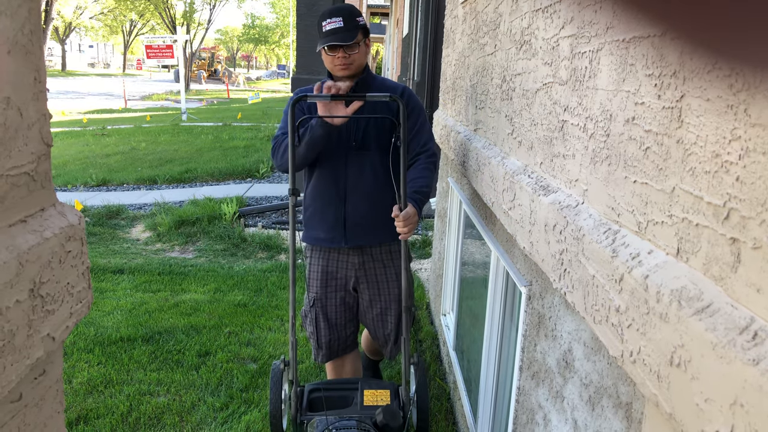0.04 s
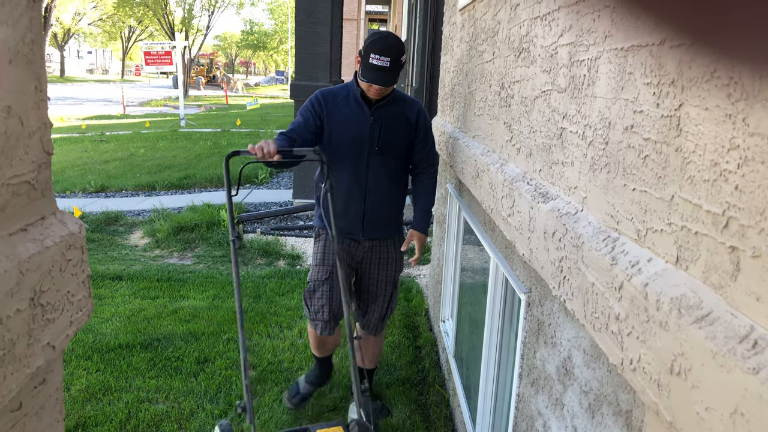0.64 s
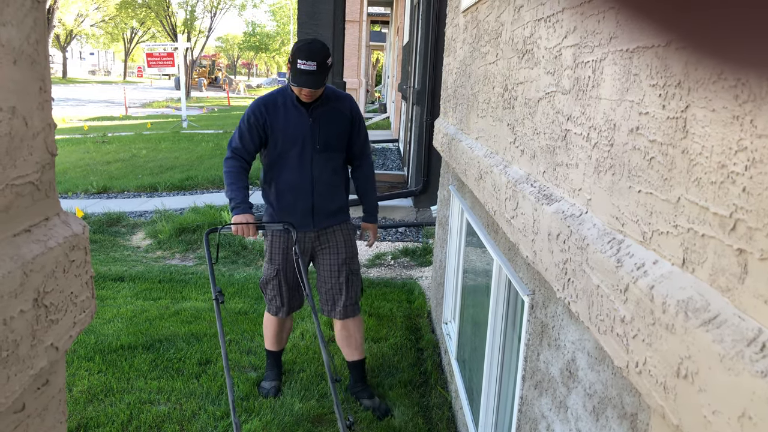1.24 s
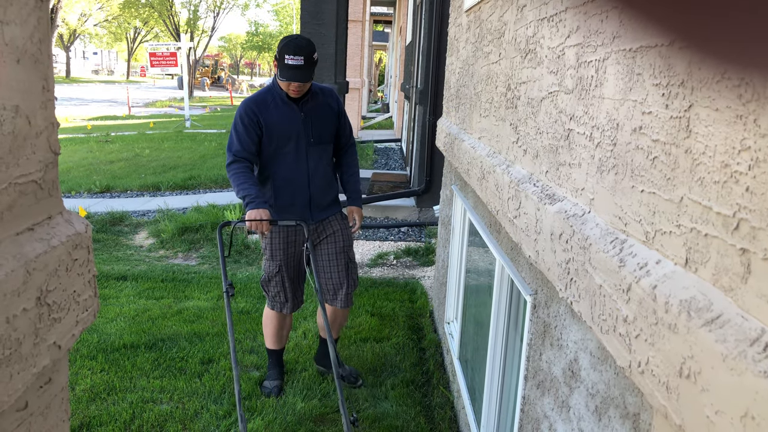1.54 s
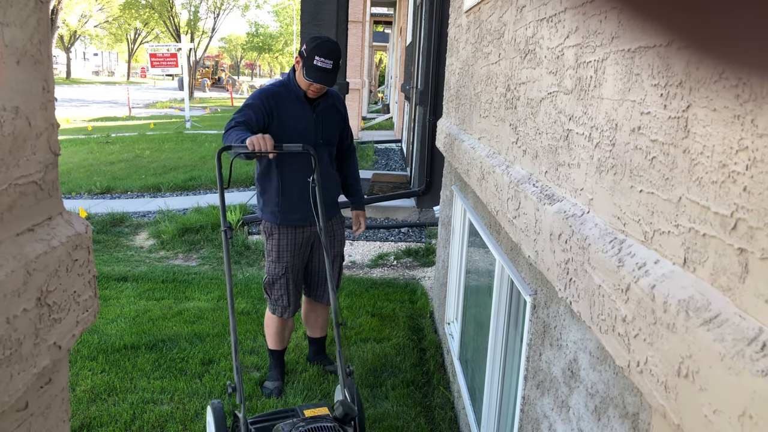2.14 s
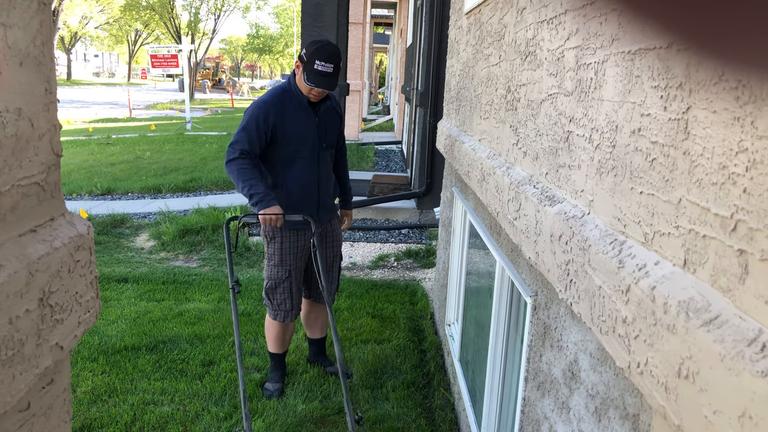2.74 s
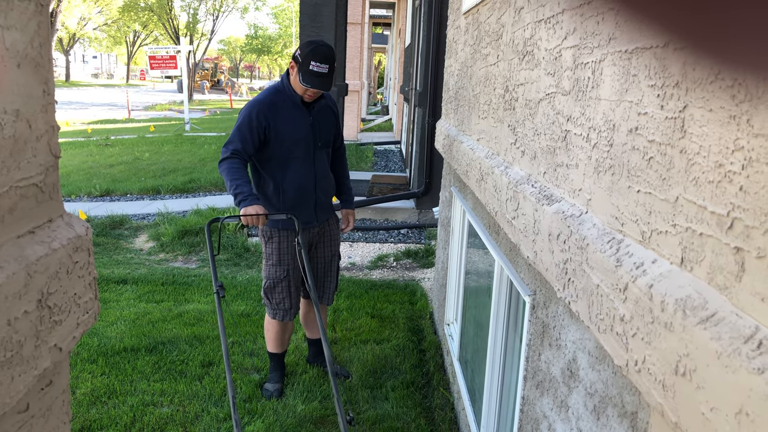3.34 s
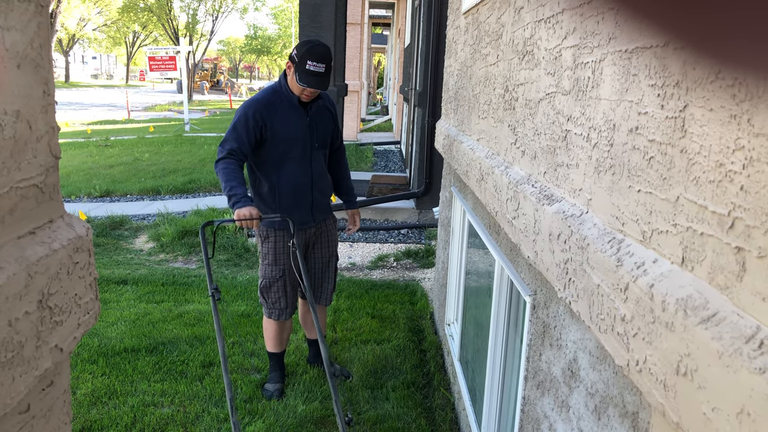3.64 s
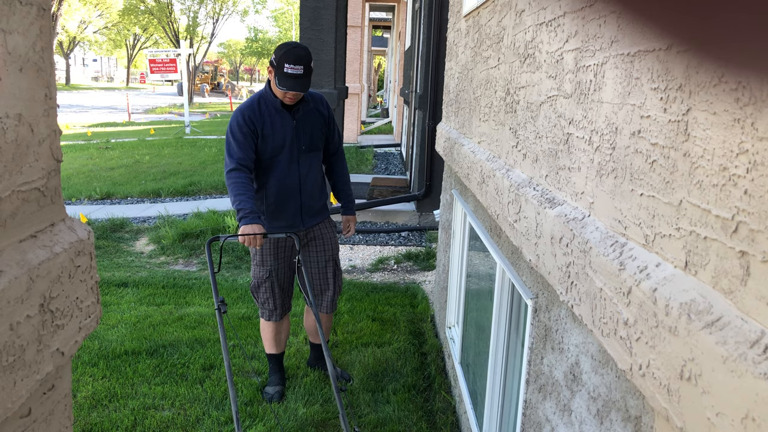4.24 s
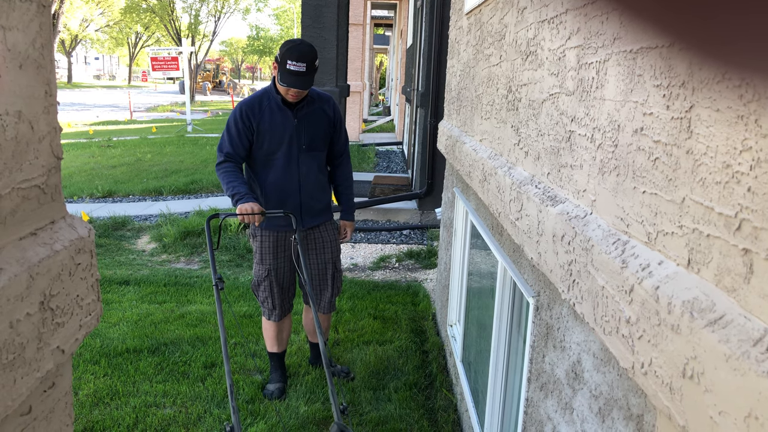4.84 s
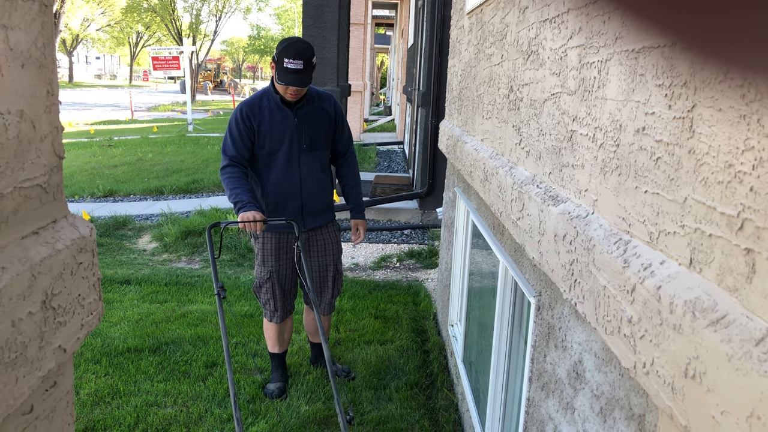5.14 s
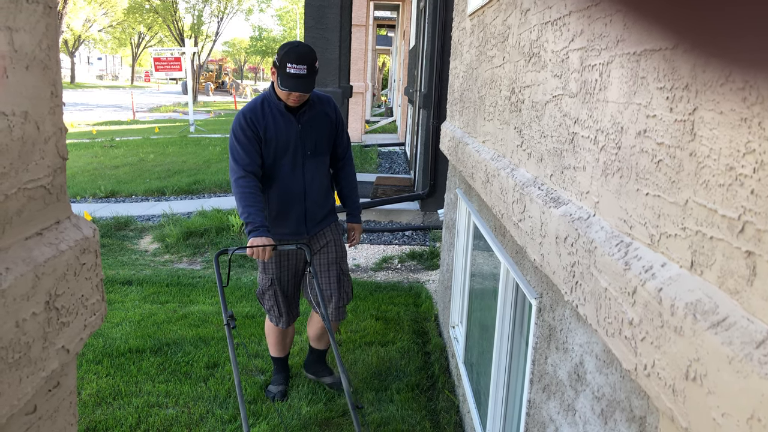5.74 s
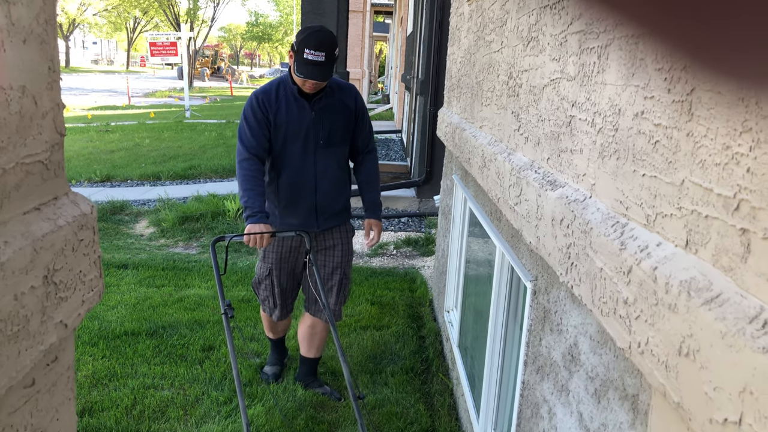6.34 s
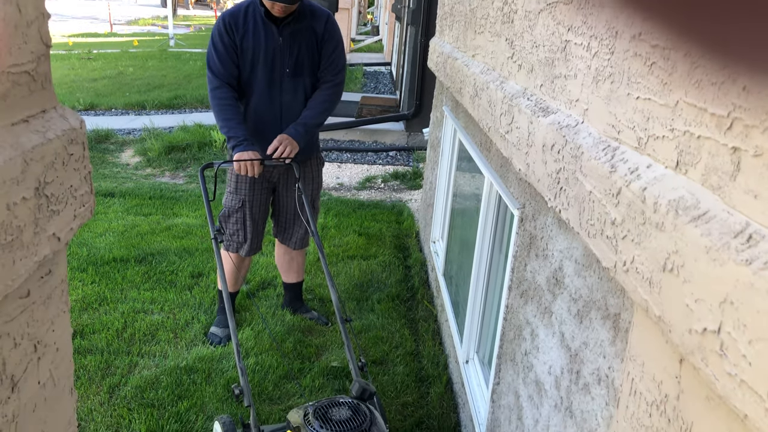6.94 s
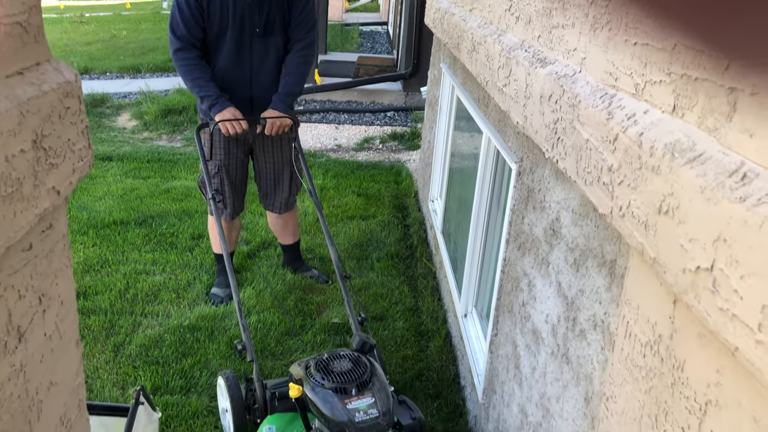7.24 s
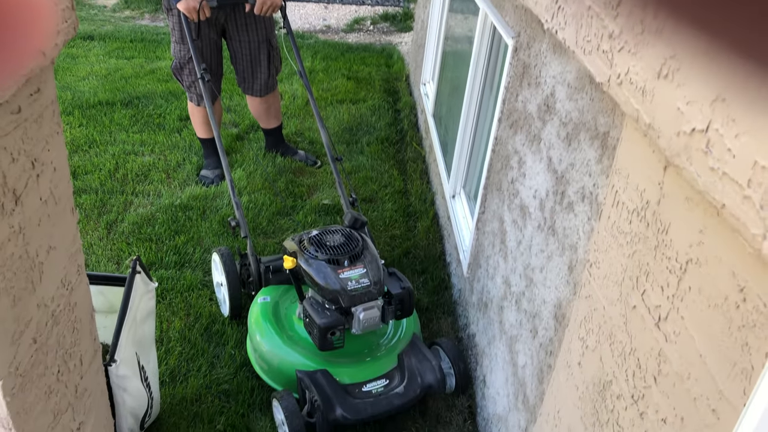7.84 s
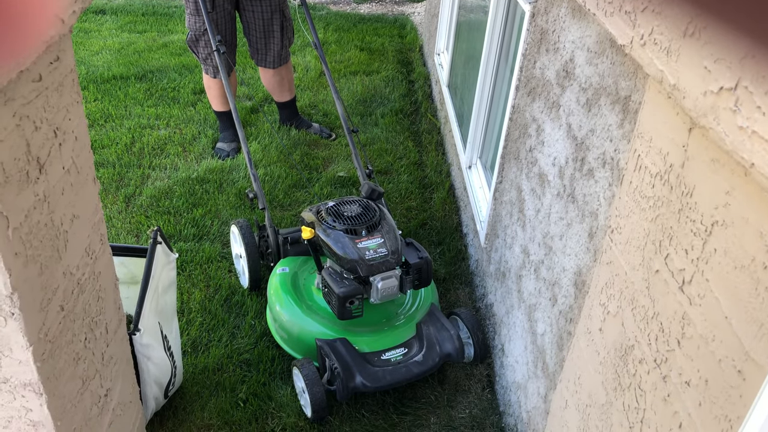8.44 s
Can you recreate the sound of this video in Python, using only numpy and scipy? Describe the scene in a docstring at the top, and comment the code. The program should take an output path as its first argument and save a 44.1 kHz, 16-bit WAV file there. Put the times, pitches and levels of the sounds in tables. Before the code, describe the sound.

Close by, between two house walls, a lawn mower is shunted over grass without its engine running. Soft wheel thuds lead into sharp metallic clacks, clinks and rattles from the loose handle, mixed with hollow plastic knocks. The clatter dies down halfway, leaving a faint rustle of a finger near the microphone, a low town rumble and barely audible birds. A quick run of dry ratchet clicks from the wheels ends it.

```python
"""A lawn between two house walls, a push mower shunted about close to the microphone, engine off.
Its loose steel handle slams and clacks in the brackets and sets the deck booming; the wheels tick,
knock and bump over the turf, and their ratchet snaps as the mower is pushed forward.
Grass swishes, a finger rubs and slides near the microphone, and the walls echo the mower.
Far off are the rumble of a town and a few faint birds."""
import sys
import numpy as np
from scipy import signal
from scipy.fft import rfft, irfft, next_fast_len
from scipy.io import wavfile

SR = 44100
rng = np.random.default_rng(int(sys.argv[2]) if len(sys.argv) > 2 else 0)


def store_pcm(level_fs):
    """Save levels as 16-bit WAV."""
    pcm = np.round(np.clip(level_fs, -1, 1) * 32767).astype(np.int16)
    wavfile.write(sys.argv[1], SR, np.atleast_2d(pcm).T)


N = 383669
TIME = np.arange(N) / SR
AGE = TIME[:SR * 3 // 10]   # time since a blow [s]
EDGE_GROWTH = 1.64   # dB of bright edge per dB of blow: harder blows are brighter

# Levels in all tables are relative: each layer adds its own gain.
# resonances of deck, handle bracket, small steel edges, wheel pawl: (pitch [Hz], width [Hz], level [dB])
DECK_MODES = [(156, 23, -1), (196, 24, -6), (232.7, 4.4, 1.5), (318.2, 33, 0), (337.6, 44.4, -1),
              (369, 78, -5.5), (468.4, 9.4, -3), (561, 31, -6.5), (603, 34, -9), (704, 36, -5.5),
              (808, 62, -8), (936, 180, -12.5), (1125, 34, -13.5), (1184, 230, -12)]
BRACKET_MODES = [(1490, 183.5, -16.5), (1710, 210, 0.5), (1873, 276, 4), (2114, 610, -2), (2600, 310, 4),
                 (2890, 760, 1.5), (3460, 420, 2.5), (3580, 390, 0.5), (4200, 680, -5.5), (4660, 520, -6.5),
                 (5300, 520, -22.5)]
EDGE_MODES = [(5640, 1000, -2.5), (6900, 470, -1), (8200, 1700, -2.5), (9950, 900, 2.5), (10500, 1300, -1),
              (12100, 1500, -3), (14600, 1100, -5)]
PAWL_MODES = [(453, 120, 2.5), (690, 230, 7), (920, 150, 6), (1240, 140, 7.5), (1766, 170, 3.5),
              (2160, 320, 6.5), (2550, 430, 4), (3370, 940, -2)]
# how briskly the mower rolls: (time [s], level [dB])
ROLLING_LEVEL = [(0, -69), (0.2, -50.5), (0.55, -56), (0.93, -53), (1.02, -27), (1.17, -41), (1.55, -59),
                 (1.75, -49.5), (2.45, -46.5), (2.6, -50), (2.75, -46), (3.15, -49.5), (3.38, -43.5),
                 (3.62, -56), (3.84, -42.5), (4.15, -58.5), (5.7, -54.5), (7, -82)]
# swish of the grass and of the sliding finger: (frequency [Hz], level [dB])
SWISH_SPECTRUM = [(700, -25.5), (1500, 5.5), (3000, 3.5), (4800, -5.5), (7500, -10.5), (10000, -15.5),
                  (14000, -20.5)]


def handle_slams(ping_hz=3570, swell_s=0.00201, choke_s=0.00044, ring_s=0.0051, buzz_s=0.012):
    """Steel hits the end stop: a ping swells until the handle's weight chokes it; the frame rings."""
    # slams: (time [s], level [dB])
    slams = [(0.994, -8), (1.33, -15.5), (2.7149, -8.5), (3.798, -11.5)]
    tone = np.sin(2 * np.pi * ping_hz * AGE)
    swell = np.minimum(AGE / swell_s, 1) ** .5
    choke = np.exp(-np.maximum(AGE - swell_s, 0) / choke_s)
    ring = tone * rise_and_decay(swell_s, ring_s)
    out = np.zeros(N)
    for at, db in slams:
        add(out, at, from_db(db - 2) * tone * swell * choke)
        add(out, at + swell_s, from_db(db - 19.5) * ring)
        add(out, at, blow(DECK_MODES, db - 23, .0015, buzz=(4, .018), tail=(-24, .064), strike=15))
        add(out, at, blow(BRACKET_MODES, db - 19, .002,
                          buzz=(-.5, buzz_s), tail=(-30, .062), strike=12.84))
        add(out, at, blow(EDGE_MODES, db - 30.5, .0023, buzz=(-10, buzz_s), tail=(-23, .029), strike=10))
    return out


def handle_clacks():
    """The handle bounces in its brackets: they ring briefly, the heavy deck booms on."""
    # bounces: (time [s], bracket level [dB], deck level [dB])
    bounces = [(1.11, -15, -33.5), (1.2446, -13.5, -32.5), (1.473, -34.5, -47), (1.696, -24.5, -44),
               (3.0711, -27.5, -46), (3.5502, -24.5, -39), (3.691, -27, -40), (4.02, -33.5, -43)]
    out = np.zeros(N)
    for at, ring_db, boom_db in bounces:
        add(out, at, blow(DECK_MODES, boom_db, .006, buzz=(20.5, .036), tail=(-17, .07), strike=50))
        add(out, at, blow(BRACKET_MODES, ring_db - 12.5, .0069,
                          buzz=(-8.5, .018), tail=(-28, .097), strike=18.6))
        add(out, at, blow(EDGE_MODES, EDGE_GROWTH * ring_db - 12, .01,
                          buzz=(-29, .01), tail=(-10, .022), strike=5))
    return out


def joint_rattles():
    """Joints shift and grind in softer, longer contacts as the frame takes up its slack."""
    # shifts: (time [s], bracket level [dB], deck level [dB])
    shifts = [(0.964, -41, -37), (0.9775, -21, -23), (1.013, -48, -31.5), (1.032, -45, -27),
              (1.042, -30, -30), (1.654, -42.5, -33.5), (1.984, -50, -38.5), (2.37, -50, -38),
              (2.7624, -36, -38), (2.9283, -38, -37.5), (2.974, -33.5, -39), (2.988, -33.5, -35.5),
              (3.298, -44, -31), (3.322, -28.5, -32), (3.417, -39.5, -35.5)]
    out = np.zeros(N)
    for at, ring_db, boom_db in shifts:
        add(out, at, blow(DECK_MODES, boom_db - 4, .014, buzz=(-4.5, .052), tail=(-10, .06), strike=9.9))
        add(out, at, blow(BRACKET_MODES, ring_db - 8, .0074,
                          buzz=(1, .019), tail=(-30.5, .075), strike=12))
        add(out, at, blow(EDGE_MODES, EDGE_GROWTH * ring_db - 2, .0075, buzz=(-8, .023), tail=(-36, .03)))
    return out


def bolt_clinks(rise_s, decay_s):
    """A loose bolt clinks on one note at a time and stirs the bracket."""
    # clinks: (time [s], level [dB], pitch [Hz])
    clinks = [(2.048, -36, 2800), (2.7617, -37, 2550), (2.9745, -28.5, 3500), (3.301, -32, 3450),
              (3.3915, -31.5, 2700), (3.678, -36.5, 2600), (4.0198, -29, 2880), (4.0403, -35.5, 3340)]
    envelope = (1 - np.exp(-AGE / rise_s)) ** 2 * np.exp(-AGE / decay_s)
    out = np.zeros(N)
    for at, db, hz in clinks:
        add(out, at, from_db(db) * np.sin(2 * np.pi * hz * AGE) * envelope / envelope.max())
        add(out, at, blow(BRACKET_MODES, db - 21, .0017, buzz=(.5, .021), tail=(-22.5, .066), strike=9))
    return out


def handle_and_hub_clicks():
    """Crisp clicks from the handle and, at the end, plastic snaps from the wheel hub."""
    # clicks and snaps: (time [s], level [dB])
    snaps = [(1.028, -31), (1.089, -24.5), (2.0018, -36), (2.108, -36.5), (2.248, -39.5), (2.356, -29),
             (2.4273, -30), (2.986, -34), (5.514, -36), (8.372, -32), (8.6671, -29)]
    # their resonances: (pitch [Hz], width [Hz], level [dB])
    snap_modes = [(1400, 280, 6), (1950, 500, 1), (2700, 540, -1), (3450, 780, -2.5), (4500, 600, -8),
                  (5700, 830, -11.5), (8280, 2200, -17.5)]
    out = np.zeros(N)
    for at, db in snaps:
        add(out, at, blow(snap_modes, db - 15.5, .005, buzz=(-13.5, .021), tail=(-24.5, .054), strike=8))
    return out


def loose_parts(per_s_per_db, contact_s, still_db):
    """Small parts chatter louder and more often as the mower rolls faster; below still_db they rest."""
    rolling_db = curve(ROLLING_LEVEL)
    touches = clicks(per_s_per_db * np.maximum(rolling_db - still_db, 0), spread_db=6)
    envelope = signal.lfilter([1], [1, -np.exp(-1 / (contact_s * SR))], touches)
    contacts = envelope * rng.standard_normal(N)
    pawl = from_db(-22) * rms_one(resonate(contacts, PAWL_MODES))
    bracket = from_db(-34.5) * rms_one(resonate(contacts, BRACKET_MODES))
    return from_db(rolling_db) * (pawl + bracket)


def deck_thumps(db_per_octave, rise_s, decay_s):
    """The deck lands with its whole weight, heaves at one pitch and stirs the modes around it."""
    # landings: (time [s], level [dB], pitch [Hz])
    landings = [(0.981, -27, 357), (0.993, -32.5, 270), (1.051, -28, 300), (2.722, -32, 197),
                (3.326, -26.5, 282), (3.784, -34.5, 191), (3.802, -30.5, 157), (4.823, -47.5, 380),
                (5.507, -52.5, 276)]
    heave = rise_and_decay(rise_s, decay_s)
    out = np.zeros(N)
    for at, db, centre_hz in landings:
        stirred = [(hz, width, mode_db - db_per_octave * abs(np.log2(hz / centre_hz)))
                   for hz, width, mode_db in DECK_MODES]
        add(out, at, from_db(db + 7) * np.sin(2 * np.pi * centre_hz * AGE) * heave / heave.max())
        add(out, at, blow(stirred, db - 6, .002, buzz=(-8, .043), tail=(-28, .046), strike=4.9, top_hz=700))
    return out


def wheels():
    """The plastic wheels tick as they turn and knock hollowly against the play in their axles."""
    # ticks: (time [s], level [dB])
    ticks = [(0.1404, -45), (0.165, -40), (0.2, -45), (0.2706, -41), (0.372, -44.5), (0.4464, -42.5),
             (0.5032, -41.5), (0.551, -50), (0.6, -50), (2.4616, -44.5), (2.675, -41), (2.913, -45),
             (3.046, -45.5), (3.775, -43.5), (4.034, -45), (4.087, -47), (4.2448, -49.5), (4.368, -49.5),
             (4.893, -52.5), (5.495, -43), (5.585, -51), (5.662, -50.5), (5.84, -49.5), (7.2837, -52.5)]
    # knocks: (time [s], level [dB], top of the contact's range [Hz])
    knocks = [(1.0455, -15, 1400), (1.071, -27, 1500), (1.163, -21, 990), (2.68, -24.5, 746),
              (2.793, -24, 890), (3.3215, -24, 1500), (3.781, -19.5, 1080), (3.872, -26.5, 976)]
    # resonances of a wheel: (pitch [Hz], width [Hz], level [dB])
    wheel_modes = [(300, 140, 7.5), (507, 78, 8), (644, 95, 8), (851, 59, 6.5), (1060, 130, 4),
                   (1320, 180, 7), (1700, 230, 2.5)]
    ticking, knocking = np.zeros((2, N))
    for at, db in ticks:
        add(ticking, at, blow(PAWL_MODES, db - 3.5, .015,
                              buzz=(-11, .031), tail=(-28.5, .04), strike=16, top_hz=3880))
    for at, db, top_hz in knocks:
        add(knocking, at, blow(wheel_modes, db - 13.5, .0015,
                               buzz=(7, .014), tail=(-27, .035), strike=31, top_hz=top_hz))
    return disperse(ticking, lag_s=0.0028) + disperse(knocking, lag_s=0.0025)


def ratchet(lag_s, rim_s, rim_db):
    """The pawl drops off a tooth: a dry snap, spread into a short falling chirp by the plastic wheel."""
    # drops: (time [s], level [dB])
    drops = [(7.749, -33), (7.842, -28.5), (7.8697, -33.5), (8.3028, -29), (8.349, -30), (8.377, -28),
             (8.4043, -27), (8.451, -30), (8.6674, -22)]
    # resonances of the ratchet in its wheel: (pitch [Hz], width [Hz], level [dB])
    ratchet_modes = [(380, 190, 3), (610, 34, 15), (910, 89, 4), (1058, 70, 6), (1350, 170, 7),
                     (1640, 180, 4.5), (2240, 330, 1.5), (2510, 450, 1), (2880, 400, -2.5),
                     (3340, 710, -11.5), (4130, 230, -16.5)]
    snap = resonate(1. * (AGE == 0), ratchet_modes)
    snap /= np.abs(snap).max()
    out = np.zeros(N)
    for at, db in drops:
        add(out, at, from_db(db) * snap)
        add(out, at + rim_s, from_db(db + rim_db) * snap)   # the wave comes back from the rim
        add(out, at, blow(PAWL_MODES, db - 20.5, .0023, buzz=(-4, .017), tail=(-28, .04), top_hz=4410))
    return disperse(out, lag_s)


def turf_bumps(rise_s, decay_s):
    """The wheels bump on soft turf, which swallows each thud within a few cycles."""
    # bumps: (time [s], level [dB], pitch [Hz])
    bumps = [(0.371, -28, 62), (0.387, -19, 154), (0.422, -27, 103), (0.48, -23, 74), (0.63, -25.5, 88),
             (2.182, -16, 182), (2.216, -20.5, 127), (2.254, -19, 66), (2.303, -25.5, 160),
             (2.328, -23.5, 84.5)]
    out = np.zeros(N)
    for at, db, hz in bumps:
        thud = np.sin(2 * np.pi * hz * AGE) * rise_and_decay(rise_s, decay_s)
        add(out, at, from_db(db - 7) * thud / np.abs(thud).max())
    return out


def lawn():
    """Wheels rumble and grass swishes under the deck as the mower rolls."""
    # rumble of the wheels: (frequency [Hz], level [dB])
    rumble_spectrum = [(50, -49), (100, -25.5), (160, 1.5), (320, 0.5), (500, -6), (900, -11),
                       (1500, -21.5), (2500, -24), (5000, -53.5)]
    rumble = from_db(-1.5) * noise(rumble_spectrum, flutter_db=4, flutter_per_s=210)
    blades = from_db(-25.5) * crackle(per_s=400, spread_db=4.5, top_hz=8000)
    swish = from_db(-10.5) * noise(SWISH_SPECTRUM, flutter_db=6, flutter_per_s=53)
    return from_db(curve(ROLLING_LEVEL)) * (rumble + swish + blades)


def finger_rubs(attack_s, release_s, swish_follows, pressure_db):
    """A finger rubs and slides near the microphone: strokes of rustle and high hiss over a lower swish."""
    # strokes: (start [s], length [s], rustle level [dB], hiss level [dB])
    strokes = [(0, 0.29, -65, -74), (0.465, 0.91, -58.5, -69), (1.453, 0.36, -60.5, -63),
               (1.868, 0.36, -64, -66), (2.417, 0.27, -57, -68), (2.893, 0.053, -56, -63),
               (3.216, 0.097, -66, -65), (4.082, 0.21, -62.5, -63.5), (4.43, 0.49, -67.5, -76),
               (5.32, 1.116, -62, -60), (5.7, 0.31, -61, -62), (6.112, 0.4, -87, -72),
               (6.548, 0.15, -66, -64.5), (6.78, 0.17, -63, -64), (7.168, 0.21, -60.5, -73),
               (7.425, 0.087, -63, -56.5), (7.542, 0.2, -72.5, -84)]
    # rustle of rubbing and hiss of sliding: (frequency [Hz], level [dB])
    rustle_spectrum = [(3000, -10.5), (4700, -7), (7500, -3.5), (10200, -6.5), (13000, -3), (17500, -6)]
    hiss_spectrum = [(9500, -22.5), (12000, -11.5), (14200, -5), (15500, -5), (17500, -16.5)]
    rubbing, sliding = from_db(-79), from_db(-77.5)
    for start, length, rustle_db, hiss_db in strokes:
        swell_s = attack_s * (1 + 2 * length)   # long strokes swell more slowly
        attack = (1 + np.tanh((TIME - start) / (2 * swell_s))) / 2
        release = (1 - np.tanh((TIME - start - length) / (2 * release_s))) / 2
        rubbing += from_db(rustle_db) * attack * release
        sliding += from_db(hiss_db) * attack * release
    pressure = from_db(pressure_db * drift(per_s=28))
    rustle = noise(rustle_spectrum, flutter_db=1.5, flutter_per_s=68)
    rustle += from_db(-12) * crackle(per_s=64, spread_db=3.5, top_hz=16050)
    hiss = noise(hiss_spectrum, flutter_db=3, flutter_per_s=400)
    swish = from_db(-23.5) * noise(SWISH_SPECTRUM, flutter_db=.5, flutter_per_s=30)
    return pressure * (rubbing * rustle + sliding * hiss) + rubbing ** swish_follows * swish


def brushes_and_ticks():
    """Quick brushes and short bright ticks: bell-shaped bursts of high noise."""
    # bursts: (time [s], level [dB], half length [s])
    bursts = [(0.118, -54, 0.001), (0.142, -50, 0.0015), (0.642, -54, 0.0095), (0.984, -47.5, 0.021),
              (1.043, -35, 0.012), (2.147, -43, 0.0013), (4.84, -44, 0.0011), (7.244, -58, 0.04),
              (7.334, -43, 0.0093)]
    # their colour: (frequency [Hz], level [dB])
    burst_spectrum = [(1000, -29.5), (3000, 10.5), (5000, 17), (8000, 15), (12000, 14.5), (14500, 11),
                      (17500, 5)]
    envelope = sum(from_db(db) * np.exp(-((TIME - at) / half_s) ** 2 / 2) for at, db, half_s in bursts)
    return envelope * noise(burst_spectrum, flutter_db=1.5, flutter_per_s=400)


def town(drone_hz, width_hz):
    """Far traffic rumbles under a wavering low drone."""
    # traffic: (frequency [Hz], level [dB])
    traffic_spectrum = [(25, -27.5), (45, -10), (65, -3), (85, -11.5), (125, -5), (180, -19), (300, -10.5),
                        (450, -19.5), (900, -20.5), (1400, -26.5), (2200, -43.5), (4500, -61), (10000, -62),
                        (17000, -49)]
    # swell of the drone: (time [s], level [dB])
    drone_level = [(0, -55), (3.2, -58.5), (4.6, -54), (6.2, -57), (8.7, -50.5)]
    drone = rms_one(resonate(rng.standard_normal(N), [(drone_hz, width_hz, 0)]))
    traffic = noise(traffic_spectrum, flutter_db=.8, flutter_per_s=2.9)
    return from_db(-52) * traffic + from_db(curve(drone_level)) * drone


def birds(width_hz):
    """Far whistles, smeared by distance into narrow bands, swell and fade on one note."""
    # whistles: (start [s], length [s], pitch [Hz], level [dB])
    whistles = [(.18, 0.25, 7450, -70), (6.567, 0.15, 3000, -76), (7.0, .2, 3100, -75),
                (8.052, 0.12, 3080, -71)]
    out = np.zeros(N)
    for start, length, hz, db in whistles:
        band = [(hz, width_hz, 0)]
        note = rms_one(resonate(resonate(rng.standard_normal(N), band), band))
        swell = np.sin(np.pi * np.clip((TIME - start) / length, 0, 1))
        out += from_db(db) * swell * note
    return out


def blow(modes, level_db, contact_s, buzz, tail, strike=0, top_hz=SR):
    """A strike, a burst of tiny contacts, a buzz and a tail, both (level [dB], decay [s]), ring modes."""
    (buzz_db, buzz_s), (tail_db, tail_s) = buzz, tail
    spurts = rms_one(from_db(.5 * drift(per_s=260, time=AGE)))   # loose parts buzz unevenly
    chatter = np.exp(-(AGE / contact_s) ** 2)
    chatter += from_db(buzz_db) * spurts * np.exp(-AGE / buzz_s)
    chatter += from_db(tail_db) * np.exp(-AGE / tail_s)
    # each blow lands under another load, shifting the modes, and on another spot, favouring others
    struck = [(hz * (1 + .0099 * rng.standard_normal()), width, db + 2.2 * rng.standard_normal())
              for hz, width, db in modes]
    force = strike * (AGE == 0) + chatter * rng.choice([-1, 1], len(AGE))
    # a part radiates little outside the range of its modes; a soft contact stops at top_hz
    span_hz = [.8 * modes[0][0], min(1.4 * modes[-1][0], top_hz, .45 * SR)]
    sound = signal.sosfilt(signal.butter(3, span_hz, "band", fs=SR, output="sos"), resonate(force, struck))
    attack = sound[:round(.03 * SR)]   # level_db is the rms of this part
    return from_db(level_db) * sound / np.sqrt(np.mean(attack ** 2))


def resonate(x, modes):
    """Parallel resonances of alternating sign, each with its own level."""
    out = 0
    for k, (hz, width, db) in enumerate(modes):
        radius = np.exp(-np.pi * width / SR)
        poles = [1, -2 * radius * np.cos(2 * np.pi * hz / SR), radius ** 2]
        gain = (-1) ** k * from_db(db) * (1 - radius ** 2) / 2
        out += gain * signal.lfilter([1, 0, -1], poles, x)
    return out


def disperse(x, lag_s):
    """Bending waves carry low notes more slowly; the delay is lag_s at 1 kHz."""
    size = next_fast_len(N + SR, True)
    khz = np.fft.rfftfreq(size, 1 / SR) / 1000
    cycles = 1000 * lag_s * (3 * np.sqrt(khz) - khz / 2)
    return irfft(rfft(x, size) * np.exp(-2j * np.pi * cycles), size)[:N]


def noise(spectrum, flutter_db, flutter_per_s):
    """Noise of a given colour whose level flutters; rms 1."""
    hz, db = np.transpose(spectrum)
    size = next_fast_len(N, True)
    gain = from_db(np.interp(np.log(np.fft.rfftfreq(size, 1 / SR) + 1), np.log(hz), db))
    coloured = irfft(rfft(rng.standard_normal(size)) * gain, size)[:N]
    return rms_one(coloured * from_db(flutter_db * drift(flutter_per_s)))


def crackle(per_s, spread_db, top_hz):
    """Tiny bright flicks at random moments; rms 1."""
    flicks = clicks(per_s, spread_db) * rng.choice([-1, 1], N)
    return rms_one(signal.sosfilt(signal.butter(1, [2500, top_hz], "band", fs=SR, output="sos"), flicks))


def clicks(per_s, spread_db):
    """Impulses at random moments, most of them faint."""
    sizes = from_db(spread_db * np.minimum(rng.exponential(1, N), 4))
    return sizes * (rng.random(N) < per_s / SR) + 1e-18


def drift(per_s, time=TIME):
    """Wander through per_s random points a second, each of spread 1."""
    points = rng.standard_normal(4000)
    return np.interp(time * per_s, np.arange(len(points)), points)


def rise_and_decay(rise_s, decay_s):
    """Envelope that builds and dies away exponentially."""
    return (1 - np.exp(-AGE / rise_s)) * np.exp(-AGE / decay_s)


def curve(points):
    """Join (time [s], value) points by straight lines."""
    return np.interp(TIME, *np.transpose(points))


def from_db(db):
    """Decibels to gain."""
    return 10 ** (np.asarray(db) / 20)


def rms_one(x):
    """Scale to rms 1."""
    return x / np.sqrt(np.mean(x ** 2) + 1e-20)


def add(track, at, sound):
    """Mix a sound into the track, starting at a time in seconds."""
    start = round(at * SR)
    track[start:start + len(sound)] += sound[:max(N - start, 0)]


def scene():
    """The mower close by, its echoes off the walls, and town and birds in the distance; mono."""
    # echoes off the house walls: (delay [s], level [dB])
    wall_echoes = [(.0052, -32), (0.0113, -25.5), (0.02, -19), (.048, -33)]
    mower = handle_slams() + handle_clacks() + joint_rattles()
    mower += bolt_clinks(rise_s=0.00035, decay_s=0.0011) + handle_and_hub_clicks()
    mower += loose_parts(per_s_per_db=6, contact_s=0.0023, still_db=-53)
    mower += deck_thumps(db_per_octave=7.5, rise_s=0.0017, decay_s=0.0077)
    mower += wheels() + ratchet(lag_s=0.001785, rim_s=0.0036, rim_db=-5.5)
    out = mower + turf_bumps(rise_s=0.0005, decay_s=0.0092) + lawn()
    out += finger_rubs(attack_s=0.027, release_s=0.018, swish_follows=0.64, pressure_db=-2.7)
    out += brushes_and_ticks() + town(drone_hz=81.2, width_hz=12) + birds(width_hz=240)
    for delay_s, echo_db in wall_echoes:
        add(out, delay_s, from_db(echo_db) * mower)
    return out[None]


def record(dry):
    """The microphone sheds the bass below 40 Hz; the top is cut steeply at 17.3 kHz."""
    thinned = signal.sosfilt(signal.butter(2, 40, "high", fs=SR, output="sos"), dry)
    return signal.sosfilt(signal.ellip(10, .1, 70, 17300, fs=SR, output="sos"), thinned)


dry = scene()
out = record(dry)
store_pcm(out)
```